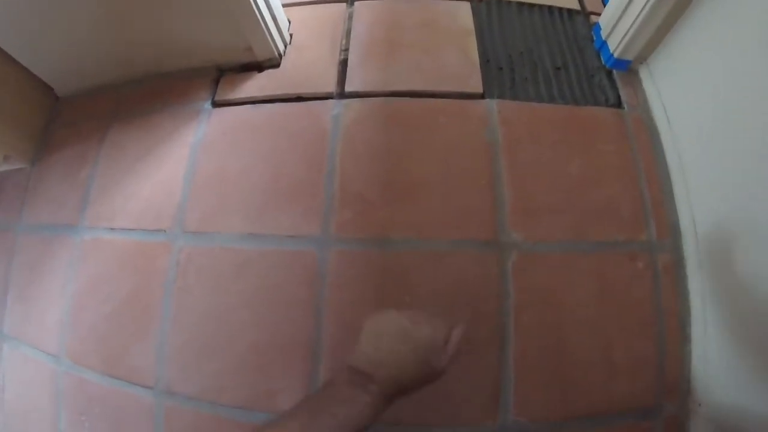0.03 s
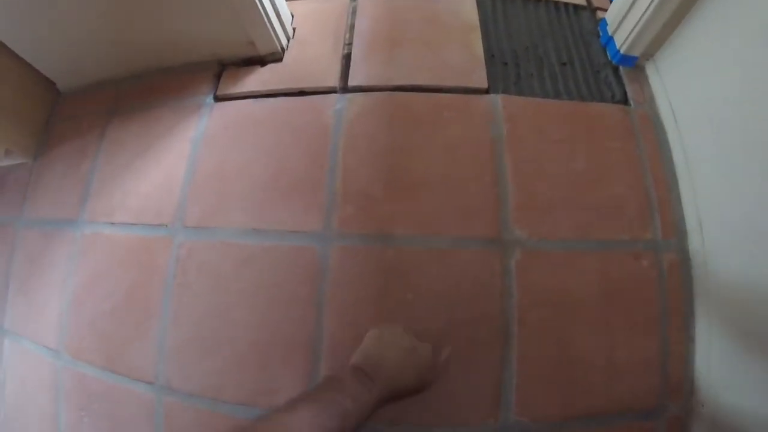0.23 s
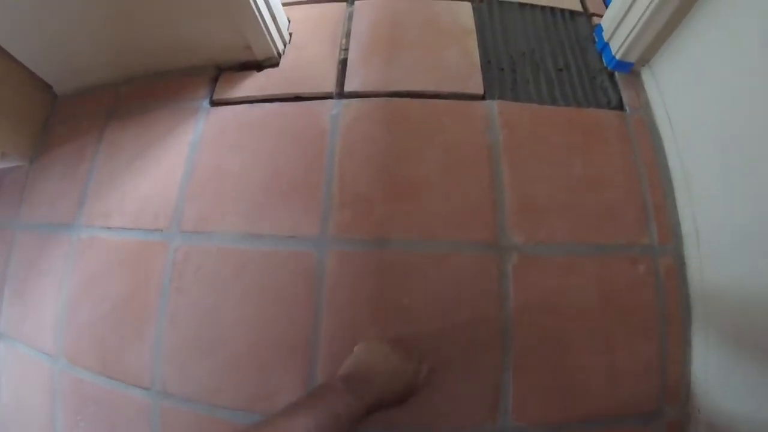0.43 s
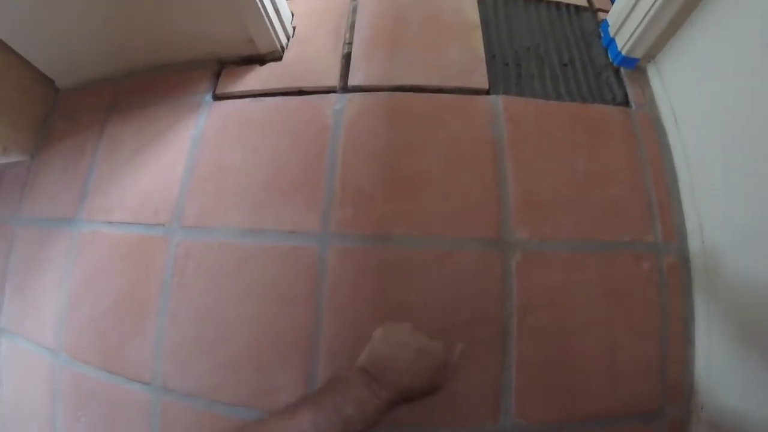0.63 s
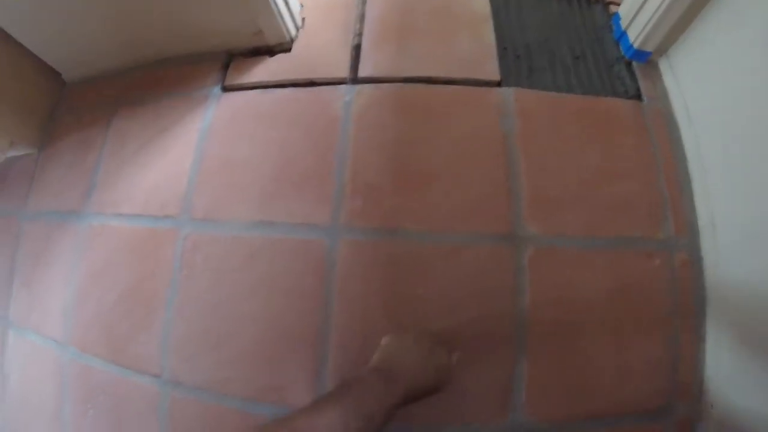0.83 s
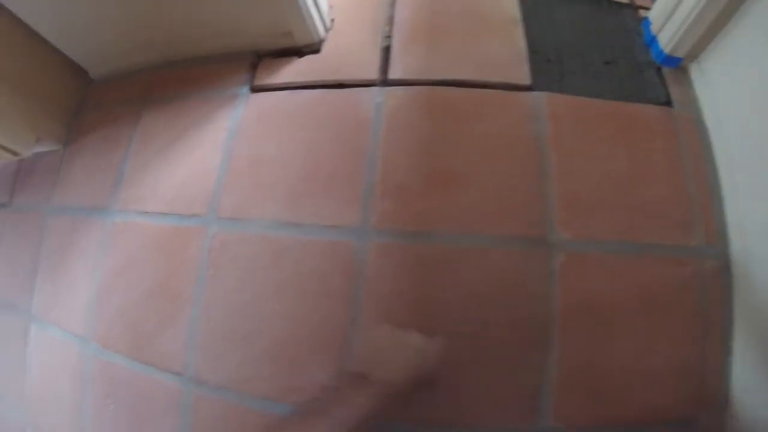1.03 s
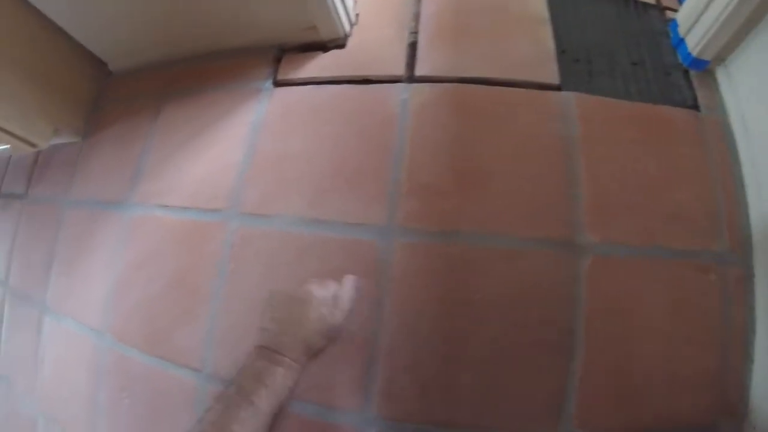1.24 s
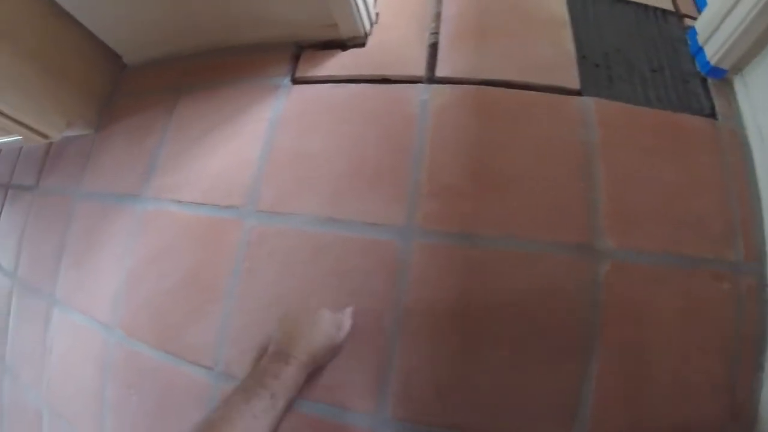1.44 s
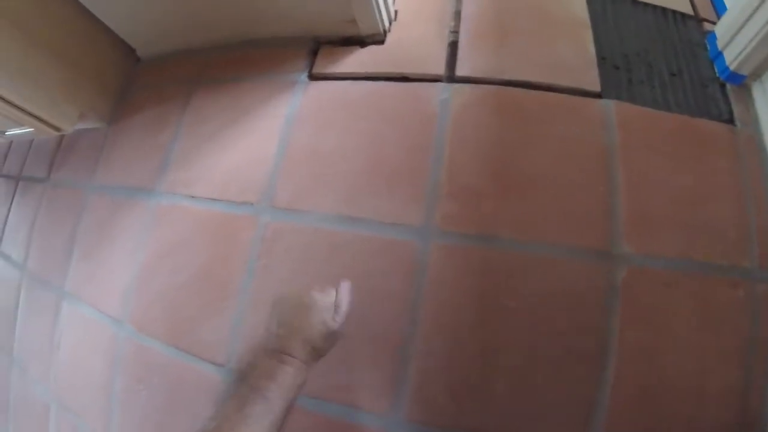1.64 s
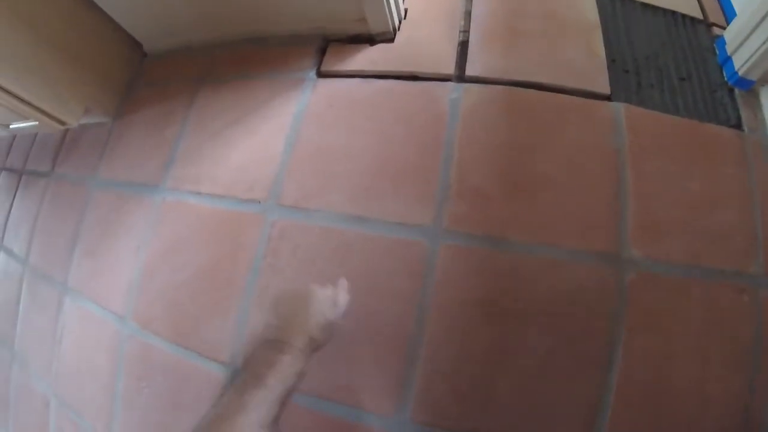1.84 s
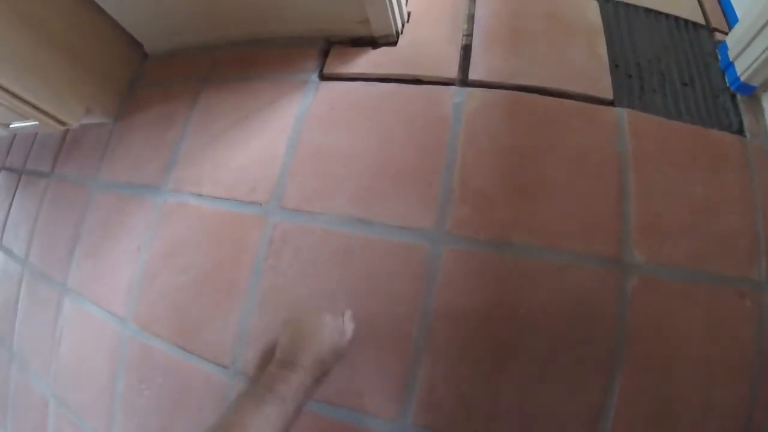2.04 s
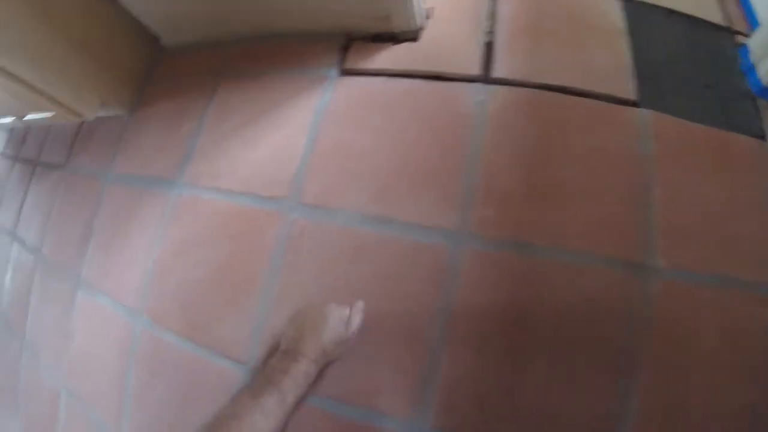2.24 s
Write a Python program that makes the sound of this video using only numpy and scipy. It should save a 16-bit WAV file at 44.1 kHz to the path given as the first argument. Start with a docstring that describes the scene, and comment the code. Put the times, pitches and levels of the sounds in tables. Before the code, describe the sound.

Close knuckle knocks on hard floor tiles come in two evenly paced sets of three, with a short gap between. Each damped knock leaves a brief echo in a small, quiet room with a low background rumble.

```python
"""A low rumble and faint hiss run throughout, in a small hard room.
Close up, knuckles rap three times on a clay tile floor, pause, then rap three times more.
Each blow rings heavily damped modes of tile and fist, in a mix set by how the hand lands,
and the skin ticks faintly. The room answers each with reflections, then a short ring."""
import sys
import numpy as np
from scipy import signal
from scipy.fft import rfft, irfft
from scipy.io import wavfile

SR = 44100
rng = np.random.default_rng(int(sys.argv[2]) if len(sys.argv) > 2 else 0)


def file_out(sig):
    """Save sig as 16-bit WAV at sys.argv[1]."""
    # one column per channel
    cols = np.atleast_2d(sig).T
    # limit, then scale
    lim = np.clip(cols, -1, 1)
    pcm = np.round(lim * 32767).astype(np.int16)
    wavfile.write(sys.argv[1], SR, pcm)


N = 105840


def undb(db):
    """Decibels to linear gain."""
    return 10 ** (np.asarray(db) / 20)


def fade(t, t60):
    """Exponential decay, 60 dB down after t60."""
    return np.exp(-np.log(1000) * t / t60)


def noise(points):
    """Noise of rms 1, shaped by an EQ curve of (frequency [Hz], level [dB]) points."""
    hz, db = np.array(points).T
    f = np.maximum(np.fft.rfftfreq(N, 1 / SR), 1)
    eq = undb(np.interp(np.log(f), np.log(hz), db))
    shaped = irfft(rfft(rng.standard_normal(N)) * eq, N)
    return shaped / shaped.std()


def ring(t, modes):
    """Damped modes ringing after a sharp push."""
    return sum(undb(db) * fade(t, t60) * np.cos(2 * np.pi * hz * t) for hz, db, t60 in modes)


def add(out, x, start_s):
    """Mix a sound in from a given time."""
    i = int(start_s * SR)
    out[i:i + len(x)] += x[:N - i]


def background():
    """A steady bed: low rumble of the building and hiss of the microphone."""
    # EQ curves (frequency [Hz], relative spectral level [dB])
    rumble_eq = [(15, -27.5), (28, -13.5), (43, -2), (55, -3), (68, -0.5), (85, -4), (102, -16),
                 (122, -11.5), (150, -19), (230, -22), (290, -25), (560, -31), (1200, -38.5), (2500, -72.5)]
    hiss_eq = [(500, -5), (1500, 4.5), (2500, 3.5), (3700, 0.5), (5000, -8), (6000, -7.5), (6530, 3.5),
               (7000, -4), (8800, -7.5), (10400, -17.5), (12000, -12.5), (13500, -19), (14700, -28)]
    rumble_db, hiss_db = -37.5, -56.5
    return undb(rumble_db) * noise(rumble_eq) + undb(hiss_db) * noise(hiss_eq)


def room(x):
    """Hard surfaces add near reflections, early scatter, a diffuse tail and standing waves."""
    # slaps off nearby walls and cupboards (delay [s], level [dB])
    reflections = [(.0024, -11.5), (.0046, -24), (0.0122, -26), (0.0143, -21.5), (0.025, -22.5),
                   (0.04, -17)]
    # bands of the diffuse tail (centre [Hz], level [dB], t60 [s])
    tail_bands = [(152, -6.5, 0.78), (291, -8.5, 0.38), (395, -8.5, 0.69), (637, -5, 0.68),
                  (847, -5.5, 0.75), (1037, -11, 0.84), (1170, -6, 0.86), (1700, -4.5, 0.67),
                  (3000, -10, 0.8), (8000, -8, .25)]
    # standing waves (frequency [Hz], relative level [dB])
    standing_waves = [(328, -1), (398, -5), (431, -4.5), (522, 5), (581, -4.5), (635, 0.5), (678, 4),
                      (759, 5), (921, 3.5)]
    build_s, scatter_db, scatter_t60_s = 0.0027, -5, 0.072
    standing_db, standing_t60_s = -67.5, 0.78
    t = np.arange(SR) / SR
    build = 1 - np.exp(-(t / build_s) ** 2)
    log_f = np.log(np.maximum(np.fft.rfftfreq(SR, 1 / SR), 1))
    log_centres = np.log(np.array(tail_bands)[:, 0])
    diffuse = rfft(rng.standard_normal(SR))
    response = np.zeros(SR)
    for share, (_, db, t60) in zip(np.eye(len(tail_bands)), tail_bands):
        band = irfft(diffuse * np.interp(log_f, log_centres, share), SR)  # crossfades into its neighbours
        envelope = build * fade(t, t60)
        response += undb(db) * envelope / np.linalg.norm(envelope) * band
    envelope = build * fade(t, scatter_t60_s)
    response += undb(scatter_db) * envelope / np.linalg.norm(envelope) * rng.standard_normal(SR)
    standing = ring(t, [(hz, db, standing_t60_s) for hz, db in standing_waves])
    response += undb(standing_db) * build * standing
    response[0] += 1  # direct sound
    for delay, db in reflections:
        response += undb(db) * np.sinc((t - delay) * SR)
    return signal.fftconvolve(x, response)[:N]


def skin_tick(t, rise_s):
    """Skin flattening on the tile: a bright puff of noise with a quick attack and decay."""
    # EQ curve (frequency [Hz], relative spectral level [dB])
    tick_eq = [(1500, 5), (2800, 8), (4200, -4.5), (6000, -4), (8500, -14), (14000, -36)]
    attack = np.minimum(t / rise_s, 1)
    decay = fade(np.maximum(t - rise_s, 0), t60=0.017)
    return attack * decay * noise(tick_eq)[:len(t)]


def radiate(x, cut_hz):
    """A small source radiates little bass."""
    return signal.sosfilt(signal.butter(4, cut_hz, "high", fs=SR, output="sos"), x)


def knuckle_blow(t, contact_ms, tuning, strike_db):
    """A rounded push rings the tile and fist; the longer the contact, the duller the knock."""
    # damped modes of tile and fist (frequency [Hz], relative level [dB], t60 [s])
    modes = [(260.7, -19, 0.043), (377.3, -5.5, 0.038), (440.4, -5.5, 0.035), (605, -5, 0.028),
             (717, -7.5, 0.029), (878, -5, 0.017), (1003.4, 0, 0.03), (1274, -18, .036), (1722, -13, 0.02),
             (2090, -18, 0.014), (2700, -9, 0.0098), (3520, -6, 0.01)]
    # thud, body, middle, clack and edge bands (bottom [Hz], top [Hz])
    strike_bands = [(230, 260), (330, 450), (580, 740), (860, 1330), (1650, 4000)]
    edges_hz, edges_db = np.ravel(strike_bands), np.repeat(strike_db, 2)
    struck = [(hz * tuning, db + np.interp(hz, edges_hz, edges_db), t60) for hz, db, t60 in modes]
    u = t / (contact_ms / 1000)
    push = u ** 3 * np.exp(-6 * u)  # peaks halfway through the contact
    return signal.fftconvolve(ring(t, struck), push / push.sum())[:len(t)]


def knocks():
    """Six raps on the tile, each a knuckle blow layered with a skin tick."""
    # how the hand lands (time [s], contact [ms], bass cut [Hz], tuning [ratio], thud [dB], body [dB],
    # middle [dB], clack [dB], edge [dB], tick trim [dB], tick rise [s])
    raps = [(0.1775, 0.61, 317, 0.98, -10, 4, -0.5, -4, 1, -0.34, 0.0017),
            (.4760, 0.53, 240, 1.047, -6.5, -18, -15, -2, 0, -1.6, 0.0022),
            (0.7991, 0.78, 316, 0.97, -15, 4, 0, -5, -2, 0.12, 0.0028),
            (1.4432, 0.62, 243, 1.018, -1.5, -7.5, -15, -4, -7.5, 1.4, 0.0033),
            (1.7662, 0.63, 269, 1.037, 4, -6.5, 3, -.5, 3.5, 3.1, 0.0026),
            (2.0772, 0.81, 258, 1, 2, -9.5, -3.5, 6, 8, -0.08, 0.0058)]
    blow_db, tick_db = -5, -35
    out, t = np.zeros(N), np.arange(SR // 8) / SR
    for start, contact_ms, cut_hz, tuning, *strike_db, trim_db, rise_s in raps:
        blow = knuckle_blow(t, contact_ms, tuning, strike_db)
        add(out, -undb(blow_db) * radiate(blow, cut_hz), start)
        add(out, undb(tick_db + trim_db) * skin_tick(t, rise_s), start)
    return out


def scene():
    """The knocks in the room, over the background, in mono."""
    return (room(knocks()) + background())[None]


def record(dry):
    """A steep low-pass cuts the top end."""
    top_hz = 14200
    return signal.sosfilt(signal.ellip(8, .2, 70, top_hz, fs=SR, output="sos"), dry)


dry = scene()
out = record(dry)
file_out(out)
```